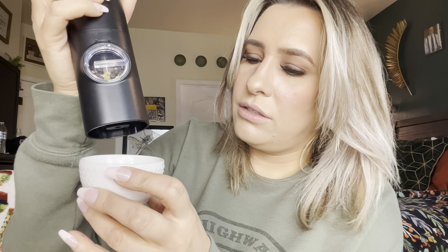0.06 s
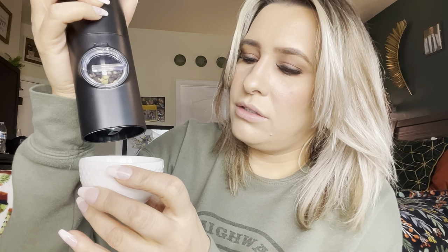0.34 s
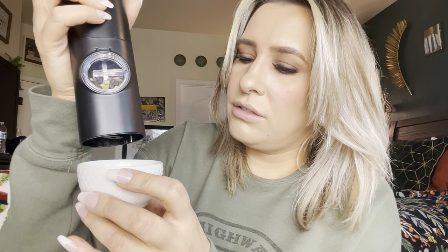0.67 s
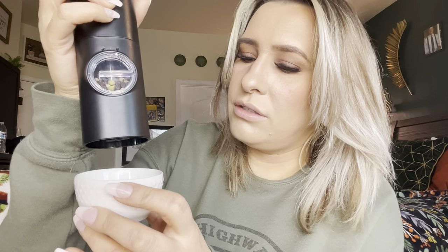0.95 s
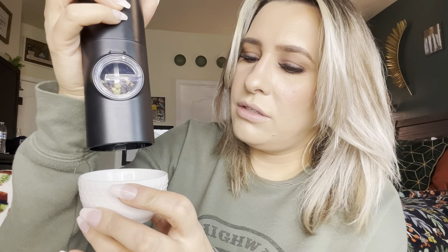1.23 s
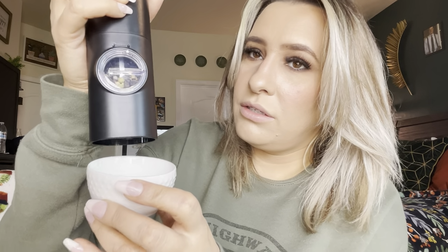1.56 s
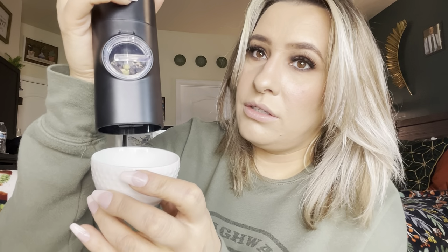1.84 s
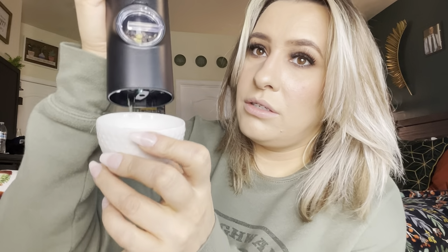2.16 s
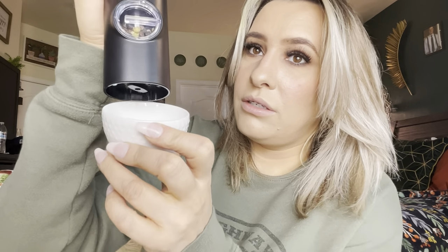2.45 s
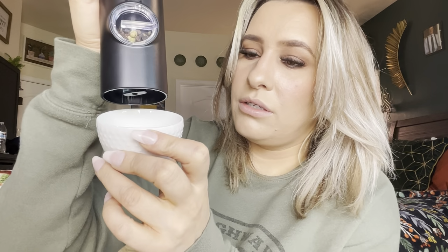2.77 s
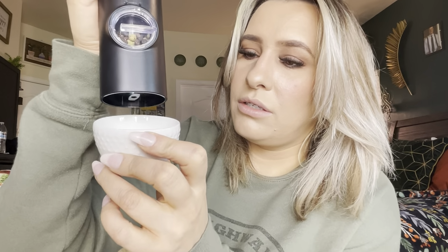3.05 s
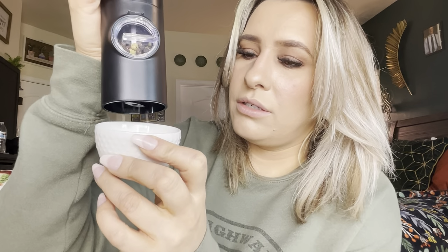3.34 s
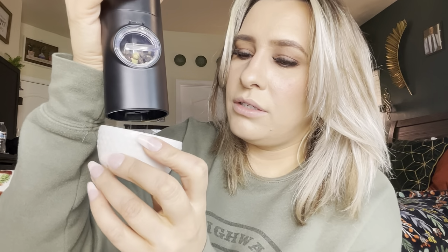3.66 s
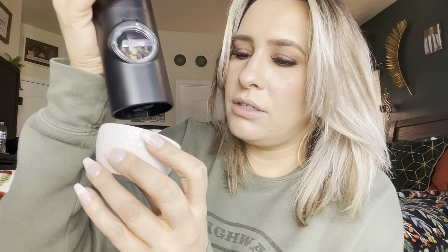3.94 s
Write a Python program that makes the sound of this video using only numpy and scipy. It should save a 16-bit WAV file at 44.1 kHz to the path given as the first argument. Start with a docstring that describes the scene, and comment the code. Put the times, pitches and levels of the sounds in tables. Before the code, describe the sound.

A battery grinder runs close to the microphone in a quiet living room. Its gears whine and rattle, dipping in pitch as grains crunch and crack sharply. Near the end the motor quickly winds down.

```python
"""Battery grinder, close up

A battery grinder runs in a living room. Its gear train whines and rattles, sagging in pitch
whenever a hard grain loads the burr; grains crunch and the big ones crack.
At the end the switch is let go and the motor coasts to a stop."""
import sys
import numpy as np
from scipy import signal
from scipy.fft import rfft, irfft
from scipy.io import wavfile
from scipy.ndimage import uniform_filter1d

SR = 44100
rng = np.random.default_rng(int(sys.argv[2]) if len(sys.argv) > 2 else 0)


def output_pcm(signal):
    """Save a mono or channel-first signal as 16-bit PCM at the path in sys.argv[1].

    Samples are clipped to [-1, 1] before scaling.
    """
    pcm = np.clip(np.atleast_2d(signal).T, -1, 1) * 32767
    wavfile.write(sys.argv[1], SR, np.round(pcm).astype(np.int16))


N = 176400
T = np.arange(N) / SR
FREQS = np.fft.rfftfreq(N, 1 / SR)


def amp(db):
    """Decibels to gain."""
    return 10 ** (np.asarray(db) / 20)


def unit(x):
    """Scale to rms 1."""
    return x / np.sqrt(np.mean(x ** 2) + 1e-20)


def curve(rows):
    """An automation curve through (time_s, value) points."""
    return np.interp(T, *np.transpose(rows))


def by_hz(rows):
    """A curve through (freq_hz, value) points, along log frequency."""
    hz, value = np.transpose(rows)
    return np.interp(np.log(FREQS + 1), np.log(hz), value)


def colour(x, eq):
    """Apply an EQ curve and scale to rms 1."""
    return unit(irfft(rfft(x) * amp(by_hz(eq)), N))


def drift(rate_hz):
    """Smooth random modulation, rms 1."""
    return unit(irfft(rfft(rng.standard_normal(N)) / (1 + (FREQS / rate_hz) ** 2), N))


def band(x, edges_hz):
    """Gentle band-pass."""
    return signal.sosfilt(signal.butter(2, edges_hz, "band", fs=SR, output="sos"), x + 1e-18)


def resonance(x, hz, width_hz):
    """One resonance with gain 1 at its peak."""
    r = np.exp(-np.pi * width_hz / SR)
    feedback = [1, -2 * r * np.cos(2 * np.pi * hz / SR), r * r]
    return signal.lfilter(np.array([1, 0, -1]) * (1 - r * r) / 2, feedback, x + 1e-18)


def tone(cycles, rough, fuzz):
    """A partial that flutters in level and phase: rough sets the slow flutter, fuzz the fast."""
    flutter = 1 + rough * (drift(30) + 1j * drift(30)) + fuzz * (drift(125) + 1j * drift(125))
    return np.real(flutter * np.exp(2j * np.pi * cycles)) / np.sqrt(.5 + rough ** 2 + fuzz ** 2)


# Tooth rate of the main gear, sagging under load: time_s, pitch_hz
TOOTH_RATE = [(0.0, 1401), (0.045, 1374), (0.1, 1250), (0.19, 1423), (0.255, 1286), (0.35, 1431),
              (0.415, 1386), (0.495, 1408), (0.57, 1257), (0.61, 1378), (0.66, 1406), (0.7, 1366),
              (0.74, 1217), (0.82, 1324), (0.855, 1295), (0.92, 1167), (0.96, 1143), (1.005, 1209),
              (1.07, 1205), (1.17, 1124), (1.26, 1248), (1.33, 1258), (1.41, 1348), (1.46, 1347),
              (1.525, 1281), (1.66, 1192), (1.725, 1211), (1.81, 1148), (1.91, 1288), (1.975, 1349),
              (2.02, 1326), (2.07, 1258), (2.22, 1315), (2.3, 1386), (2.345, 1321), (2.445, 1352),
              (2.47, 1382), (2.565, 1362), (2.615, 1304), (2.69, 1387), (2.785, 1391), (2.865, 1301),
              (3.075, 1314), (3.235, 1249), (3.285, 1290), (3.39, 1237), (3.45, 1183), (3.5, 1292),
              (3.6, 1343), (3.71, 1286)]
EASY_HZ, LOADED_HZ = 1285.6, 1167   # tooth rate at load 0 and at load 1
ROTOR_TURNS_PER_TOOTH = .1312
OFF_S, HOLD_S = 3.705, .026   # switch-off; wait before the overall fade
SINCE_OFF = np.maximum(T - OFF_S, 0)


def motor(coast_s=.095, fade_s=.14, jitter=.0015):
    """The drive, coasting after switch-off: returns teeth passed, load on the burr and fade-out gain."""
    driven_hz = curve(TOOTH_RATE)
    tooth_hz = driven_hz * np.exp(-SINCE_OFF / coast_s) * (1 + jitter * drift(60))
    load = np.clip((EASY_HZ - driven_hz) / (EASY_HZ - LOADED_HZ), -.5, 1.2)
    fade = np.clip(1 - (SINCE_OFF - HOLD_S) / fade_s, 0, 1) ** 4.1
    return np.cumsum(tooth_hz) / SR, load, fade


# Faders of the four main tones, before trim: time_s, armature_db, tooth_db, second_db, third_db
WHINE_FADERS = [(0, -64, -40, -49, -37), (0.072, -62.5, -33.5, -39, -44.5), (0.16, -65, -46, -70, -71),
                (0.2, -64, -48, -53, -38), (0.24, -60, -37, -42, -44), (0.3, -74, -44, -56, -49),
                (0.402, -70, -41, -51, -43.5), (0.55, -73, -37, -36, -43), (0.64, -66, -36.5, -65, -43.5),
                (0.72, -61, -39, -34.5, -41.5), (0.821, -63, -35, -46, -35), (0.95, -56, -42, -33, -42.5),
                (1.15, -57.5, -43, -34, -52), (1.3, -61, -37.5, -39.5, -42.5), (1.42, -53, -36, -43, -39.5),
                (1.6, -58, -38, -34.5, -44), (1.8, -54, -44, -40.5, -39.5), (2.0, -61, -36.5, -48, -50.5),
                (2.2, -67.5, -39, -47, -56), (2.5, -53, -39, -61, -50), (2.75, -51.5, -38, -55, -47),
                (2.9, -56.5, -36, -48, -40.5), (3.1, -56, -37, -48, -42), (3.25, -59, -37, -42, -48.5),
                (3.4, -61, -40, -46, -41), (3.49, -62, -41, -43, -47), (3.56, -56, -36, -36, -40.5),
                (3.67, -55, -41.5, -46, -46), (3.71, -64, -35, -31, -43)]
# Sidebands and slower gears, riding the tooth fader: tooth_multiple, offset_db, load_gain_db, fuzz
SIDE_TONES = [(.788, -17.5, -1, 0.15), (.869, -7.5, -0.5, .02), (.931, -12, -10, 0.13),
              (1.131, -19, 19, 0.058), (1.175, -12, 11.5, .1), (1.333, -17, -9, .2), (1.463, -20.5, 7, .4),
              (1.869, -8, 4, 0.33), (2.333, -15, 4, 0.37), (3.333, -18, 13, .5), (3.667, -27, 10, .4),
              (4, -10, 6, 0.37), (5, -13.5, 7, 0.6)]


def whine(teeth, load, slack_hz=(1345, 1443), slack_fuzz=.26, release_s=.032):
    """Three-pole armature hum and meshing teeth; without drive they die away, high partials first."""
    points = np.array(WHINE_FADERS, float)
    armature_db, tooth_db, second_db, third_db = (curve(points[:, [0, k]]) for k in (1, 2, 3, 4))
    # tooth_multiple, level_db, rough, fuzz
    partials = [(3 * ROTOR_TURNS_PER_TOOTH, armature_db + .21, .15, .017),
                (1, tooth_db - .22, .2, .028),
                (2, second_db - .87, .76, .5),
                (3, third_db - .023, .47, .074)]
    partials += [(multiple, tooth_db - .5 + offset_db + load_db * load, .32, fuzz)
                 for multiple, offset_db, load_db, fuzz in SIDE_TONES]
    # Running light, the teeth chatter in their play and blur every partial.
    slack = np.interp(curve(TOOTH_RATE), slack_hz, (0, 1)) + np.minimum(SINCE_OFF / HOLD_S, 2)
    mix = np.zeros(N)
    for multiple, db, rough, fuzz in partials:
        release = np.exp(-multiple * SINCE_OFF / release_s)
        mix += amp(db) * release * tone(multiple * teeth, rough, fuzz + slack_fuzz * multiple * slack)
    return mix


# Colour of the gear rasp: tooth_multiple, gain_db
RASP_EQ = [(.05, -44), (.35, -66), (.41, -13.5), (.6, -10), (.78, -21), (.95, 5.5), (1.1, -1), (1.25, -8),
           (1.4, -8), (1.65, -4), (2, -7.5), (2.6, -7), (3.1, -2.5), (6, -60.5)]


def rasp(teeth, load, level_db=-42, sag_gain_db=2.5):
    """Rough tooth flanks, played at the speed of the gears; louder while a grain is braking them."""
    flanks = colour(rng.standard_normal(N), [(multiple * EASY_HZ, db) for multiple, db in RASP_EQ])
    sag_khz_per_s = np.gradient(uniform_filter1d(load, size=1500)) * SR * (EASY_HZ - LOADED_HZ) / 1000
    gain = amp(level_db + sag_gain_db * np.clip(sag_khz_per_s, -1, 2))
    return gain * np.interp(teeth / EASY_HZ, T, flanks)


# Ring of the housing: pitch_hz, width_hz, gain_db, load_gain_db
HOUSING_MODES = [(794, 68, -5.5, -3), (1250, 31, -2, -5), (1380, 39, 2, 4), (1835, 74, -4.5, 11.5),
                 (2460, 100, -7, 5), (2506, 60, 3.5, 2.5), (4140, 730, -14.5, -5.5), (4670, 400, -28.5, 14),
                 (10200, 250, -9.5, -12), (12000, 170, -1, -10.5)]


def rattle(teeth, load, level_db=-46.5):
    """Every tooth knocks the housing with a strength of its own; load rebalances the resonances."""
    strength = amp(-np.clip(rng.standard_normal(N), -2, 2))
    knocks = np.diff(np.floor(teeth), prepend=0) * strength * rng.choice([-1, 1], N)
    ring = sum(amp(db + load_db * load) * resonance(knocks, hz, width)
               for hz, width, db, load_db in HOUSING_MODES)
    return amp(level_db) * unit(ring)


# Cues for the big grains: start_s, level_db, knock_offset_db, snap_offset_db, decay_s
CRACK_CUES = [(0.077, -21, 2.5, -2.5, 0.0023), (0.108, -14.5, -4, 6, 0.0012),
              (0.113, -15.5, -10.5, 3.5, 0.0019), (0.2569, -15.5, -10, -2.5, 0.0035),
              (0.261, -15.5, -1, 6.5, 0.0021), (0.3436, -32, -12, 12, 0.002), (0.439, -33, -7, 10, 0.0028),
              (0.57, -15, 15.5, 9.5, 0.0019), (0.624, -29, -6, -6, 0.0015), (0.697, -23, -8, -7, 0.0017),
              (0.741, -10.5, 1.5, 1, 0.0026), (0.746, -26.5, -6.5, -4, 0.0024),
              (0.894, -19, -26, 3.5, 0.0016), (1.036, -24, -21.5, 0, 0.0044),
              (1.149, -20.5, -22, -0.5, 0.0018), (1.154, -24, -13, -10, 0.0021),
              (1.193, -22, -11, -2.5, 0.0028), (1.198, -22, -19, 0.5, 0.0034),
              (1.468, -26, 4.5, -8.5, 0.0025), (1.632, -13, -22, 4.5, 0.0019), (1.637, -27, -8, 1, 0.0028),
              (1.687, -30, -4, 4.5, 0.0037), (1.8115, -23, -12.5, 2, 0.0056), (2.615, -27, -4, 11, .002),
              (3.227, -27, 0.5, 3.5, .003), (3.457, -19.5, 5, 5, 0.0032)]
# Ring of the barrel after a crack: pitch_hz, width_hz, gain_db
BARREL_MODES = [(1807, 59, 10.5), (2423, 79, 10), (3490, 110, 7)]


def cracks(trim_db=.5, attack_s=.00052, body_lag_s=.00074):
    """A big grain splits in a few milliseconds: bright snap, then body, low knock and barrel ring."""
    knock, body, snap = np.zeros((3, N))
    age = T[:SR // 10]
    for start_s, db, knock_db, snap_db, decay_s in CRACK_CUES:
        burst = amp(trim_db + db) * (1 - np.exp(-(age / attack_s) ** 2)) * np.exp(-age / decay_s)
        layers = (knock, knock_db, body_lag_s), (body, 0, body_lag_s), (snap, snap_db, 0)
        for layer, offset_db, lag_s in layers:
            start = int((start_s + lag_s) * SR)
            layer[start:start + len(age)] += amp(offset_db) * burst * rng.choice([-1, 1], len(age))
    ring = sum(amp(db) * resonance(body, hz, width) for hz, width, db in BARREL_MODES)
    lows = amp(-4) * band(band(knock, (414, 1250)), (414, 1250))
    mids = amp(10) * band(body, (1530, 4470))
    edge = amp(-1.5) * band(body, (5500, 9600))
    highs = amp(6) * band(snap, (8920, 11940))
    return ring + lows + mids - edge + highs


# Fader of the crunch at the burr: time_s, level_db
CRUNCH_FADER = [(0.0, -35), (0.53, -34.5), (0.96, -32), (1.34, -33.5), (1.7, -33), (1.84, -33), (2.15, -34),
                (2.62, -33.5), (3.1, -33.5), (3.45, -35), (3.6, -34), (3.65, -35), (3.7, -34.5)]
# Colour of breaking grain, for crunch and chips: freq_hz, gain_db
GRAIN_EQ = [(100, -39.5), (330, -56), (450, -32.5), (600, -7.5), (850, -4), (1200, 2), (1450, -8.5),
            (1800, 3.5), (2130, -2.5), (2600, -2), (3150, -0.5), (3800, -4.5), (4500, 0.5), (6000, -5),
            (7300, -8), (8700, -4.5), (10000, -1.5), (12000, -1), (12700, -1.5), (13500, -46),
            (17000, -56.5)]


def crunch(teeth, load, grains_per_s=1100, rub_gain=.7, width=.71, trim_db=-3.5, load_db=1.5):
    """Tiny fractures and rubbing all round the burr, throbbing with the rotor; stereo."""
    clicks = (rng.random((2, N)) < grains_per_s / SR) * rng.choice([-1, 1], (2, N))
    strength = amp(1.5 * np.minimum(rng.exponential(1, (2, N)), 5))
    grit = unit(clicks * strength) + rub_gain * rng.standard_normal((2, N))
    throb = 1 + .073 * np.cos(2 * np.pi * ROTOR_TURNS_PER_TOOTH * teeth)
    flicker = amp(drift(27))
    mid, side = colour(grit * throb * flicker, GRAIN_EQ)
    side = width * band(side, (400, 7000))
    return amp(curve(CRUNCH_FADER) + trim_db + load_db * load) * np.array([mid + side, mid - side])


def chips(chips_per_s=51, level_db=-39.5, spread_db=1.5, decay_s=.0024):
    """Small splinters break off at random, each a short burst of noise."""
    starts = rng.random(N) < chips_per_s / SR
    strength = amp(spread_db * np.clip(rng.standard_normal(N), -2, 2))
    envelope = signal.lfilter([1], [1, -np.exp(-1 / (decay_s * SR))], starts * strength + 1e-18)
    return amp(level_db) * envelope * colour(rng.standard_normal(N), GRAIN_EQ)


def rotor_hum(teeth, level_db=-78):
    """A faint low sine, one cycle per turn of the rotor."""
    return amp(level_db) * np.sin(2 * np.pi * ROTOR_TURNS_PER_TOOTH * teeth)


# Stereo phase: freq_hz, left_lead_rad
STEREO_PHASE = [(100, -1), (520, 1.26), (950, -0.05), (1380, 0.68), (1720, 0.9), (1980, -0.6), (2500, 1.15),
                (3190, -1.9), (3450, 1.16), (4480, -1.07), (5340, -2), (6550, -0.5), (7320, -2),
                (8350, -0.6), (8870, 0.76), (10700, 4), (11700, 6.4), (12700, 8), (14000, 8)]
# Stereo balance: freq_hz, left_minus_right_db
STEREO_BALANCE = [(60, -5), (130, -6.5), (290, -0.7), (640, 0.5), (1410, -1), (3100, -0.5), (6820, -2.5),
                  (15000, 1.2)]


def microphones(x):
    """The close sound reaches the two microphones with a difference of phase and level."""
    left = amp(by_hz(STEREO_BALANCE) / 2) * np.exp(1j * by_hz(STEREO_PHASE) / 2)
    impulses = irfft(np.array([left, 1 / left]), N)
    taps = np.roll(impulses, 128, axis=1)[:, :257] * np.hanning(257)
    return signal.fftconvolve(x, taps, "same", axes=1)


def room_reverb(x, t60_s=.31, send_db=-8.5, top_hz=6900):
    """The living room answers with a soft, short tail, different on each side."""
    age = T[:SR // 2]
    noise = band(rng.standard_normal((2, len(age))), (200, top_hz))
    tail = noise * amp(-60 * age / t60_s) * (age > .003)
    tail *= 2 * np.sqrt(top_hz / SR / np.sum(tail ** 2))   # about unity gain in its band
    return amp(send_db) * signal.fftconvolve(x[None], tail, axes=1)[:, :N]


# Colour of the still room: freq_hz, gain_db
ROOM_TONE_EQ = [(20, -44.5), (40, -8), (70, 2), (120, -4.5), (180, 0), (300, -10), (700, -14), (1500, -8.5),
                (3200, -5.5), (7000, -23), (16000, -47)]


def room_tone(level_db=-71, width=.69):
    """A quiet bed of noise, partly shared by both sides."""
    noise = rng.standard_normal(N) + width * rng.standard_normal((2, N))
    return amp(level_db) * colour(noise, ROOM_TONE_EQ)


def scene():
    """Gears and breaking grain up close, with the room behind them."""
    teeth, load, fade = motor()
    gears = fade * (whine(teeth, load) + rasp(teeth, load))
    gears += fade ** .46 * rattle(teeth, load)   # loose gears rattle on while the grinding fades
    low_cut = signal.butter(6, 370, "high", fs=SR, output="sos")   # the small barrel gives little bass
    barrel = signal.sosfilt(low_cut, gears + cracks())
    grinder = barrel + fade * (rotor_hum(teeth) + crunch(teeth, load) + chips())
    grinder -= resonance(grinder, hz=1400, width_hz=49)   # the housing radiates poorly here
    return room_tone() + microphones(grinder) + room_reverb(grinder.mean(axis=0))


def record(dry):
    """A steep high cut takes off the very top."""
    return signal.sosfilt(signal.cheby2(12, 70, 16800, fs=SR, output="sos"), dry)


dry = scene()
out = record(dry)
output_pcm(out)
```